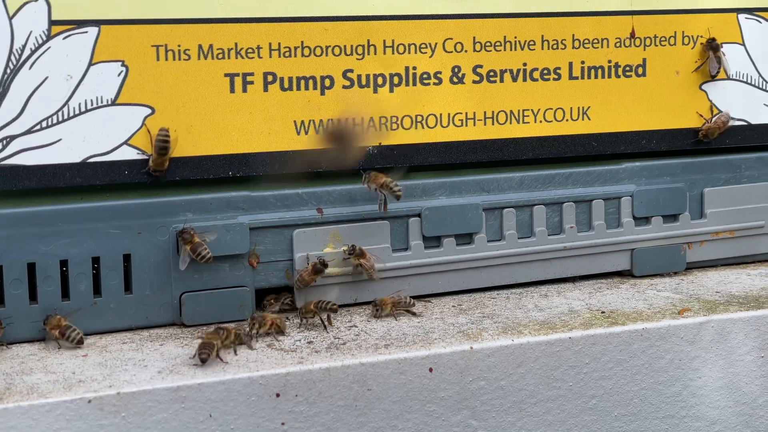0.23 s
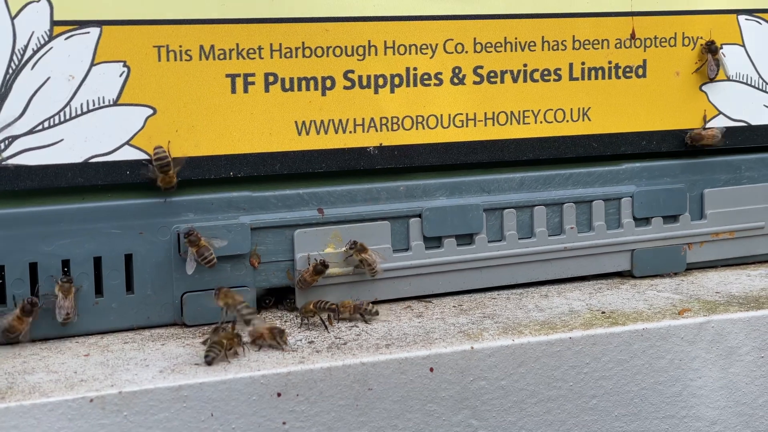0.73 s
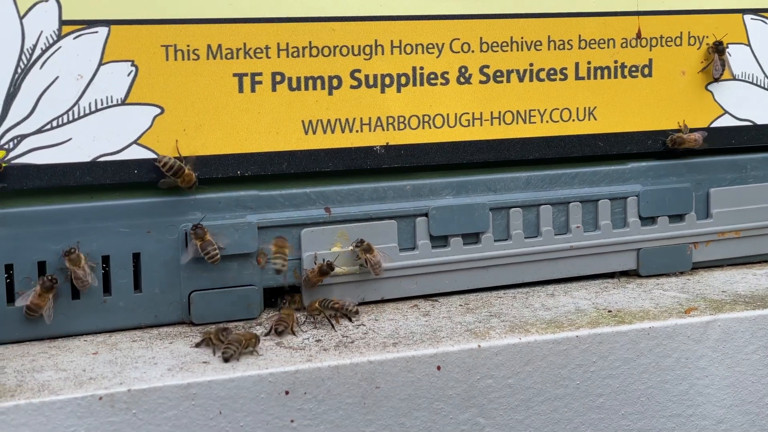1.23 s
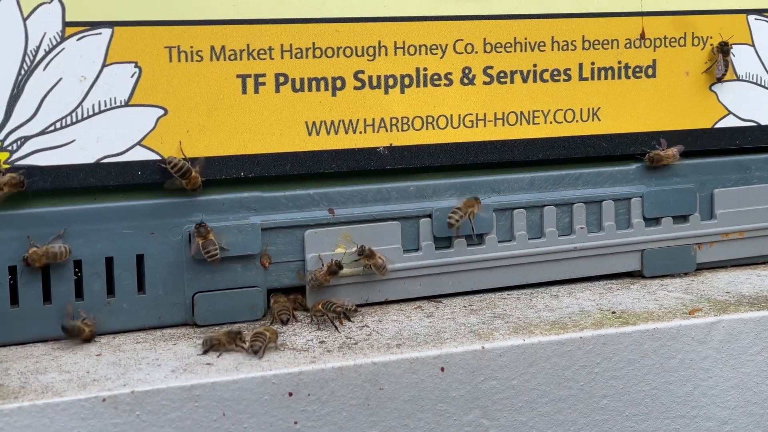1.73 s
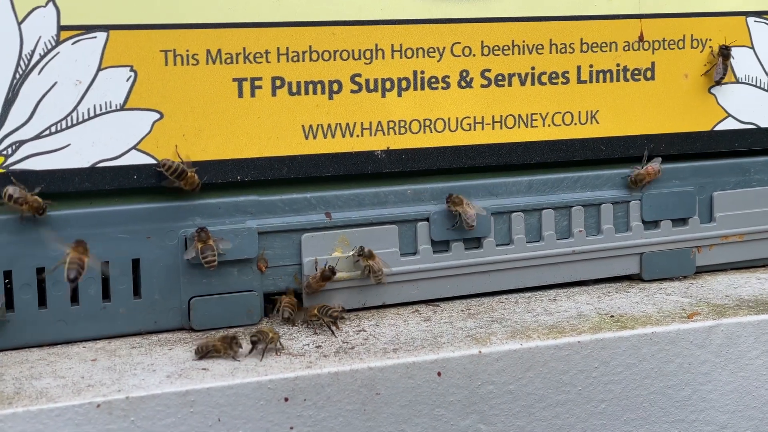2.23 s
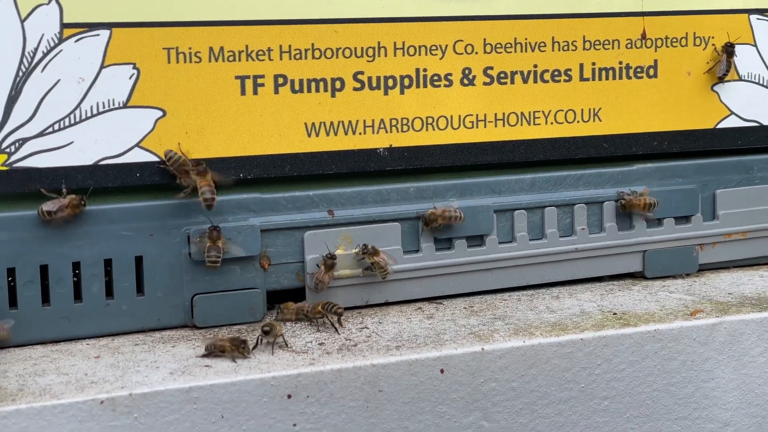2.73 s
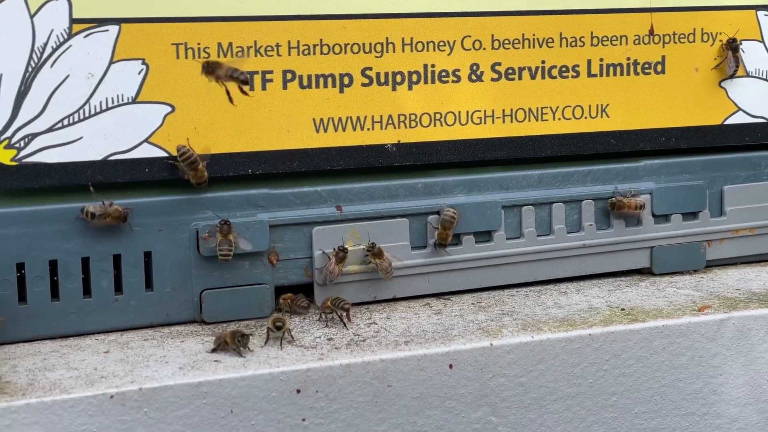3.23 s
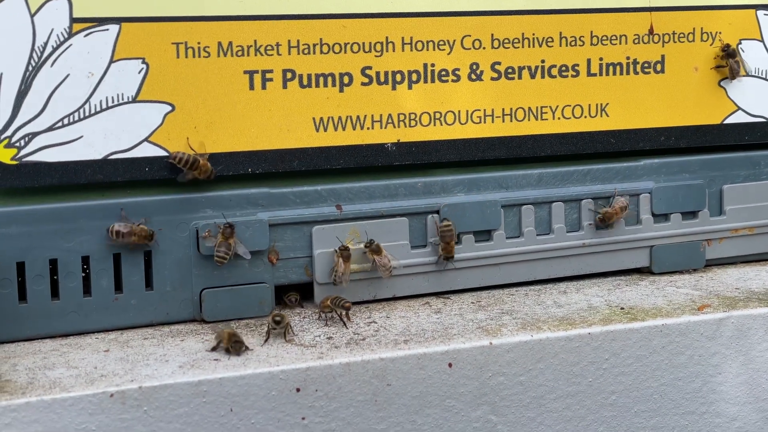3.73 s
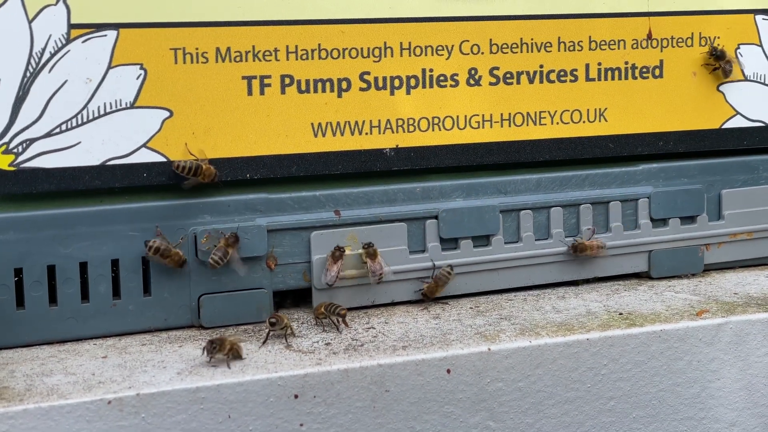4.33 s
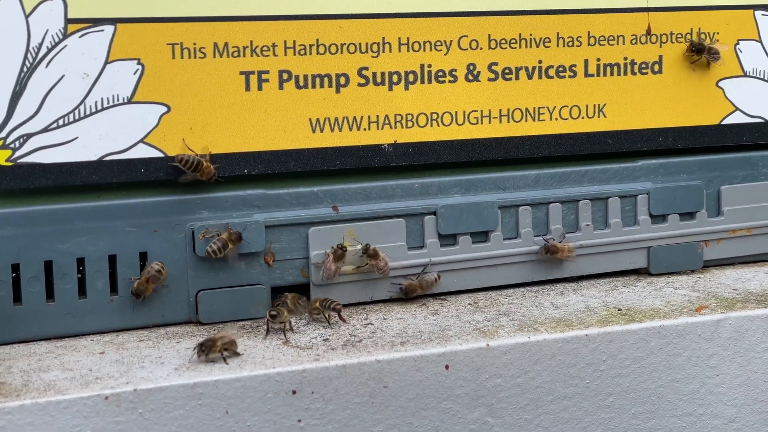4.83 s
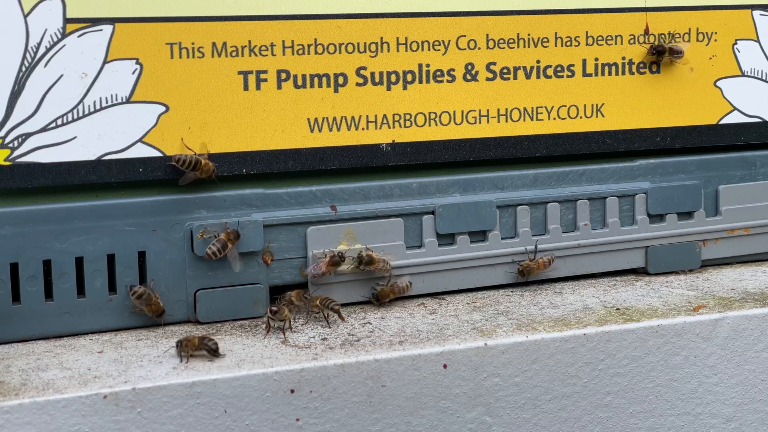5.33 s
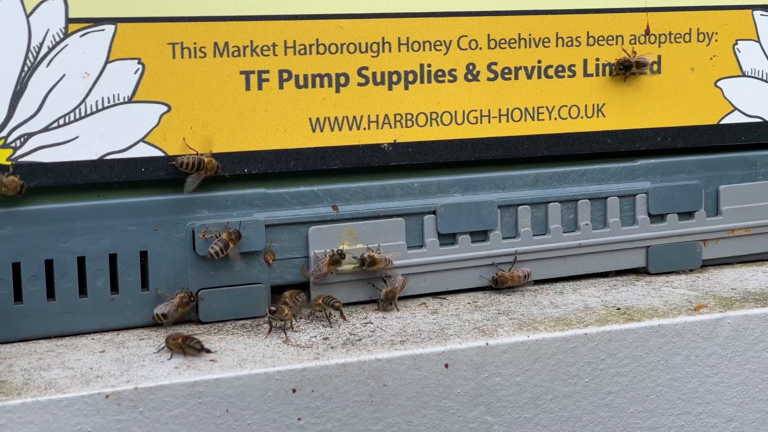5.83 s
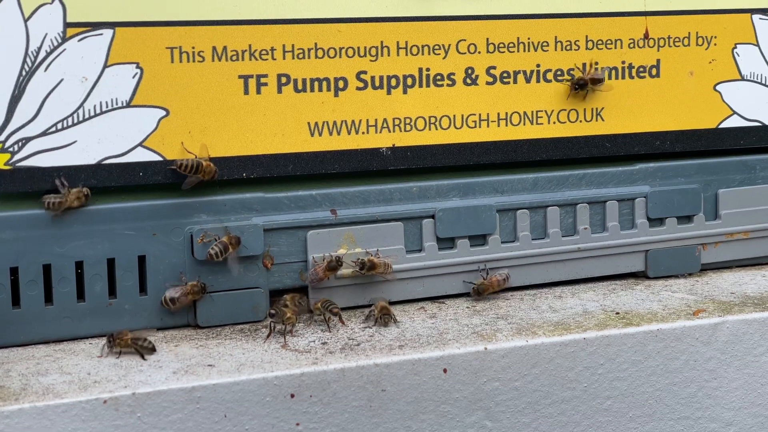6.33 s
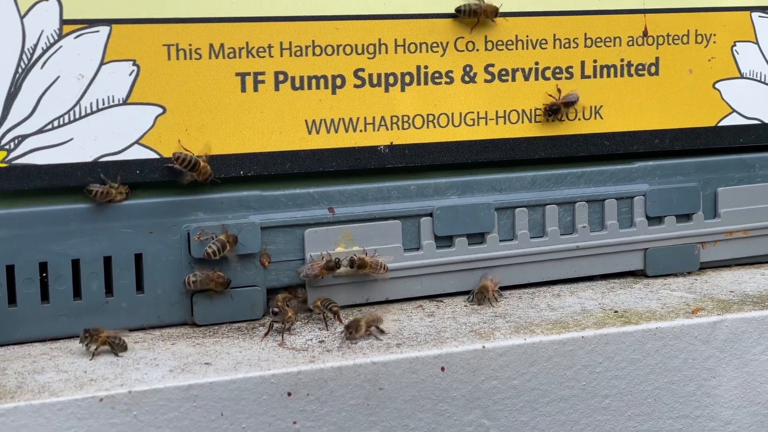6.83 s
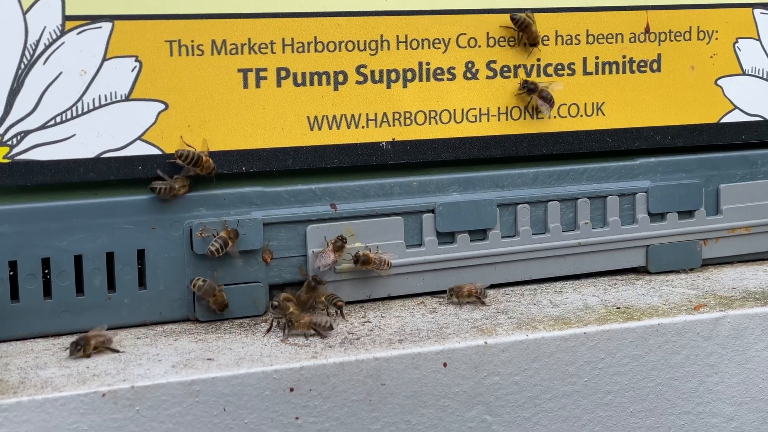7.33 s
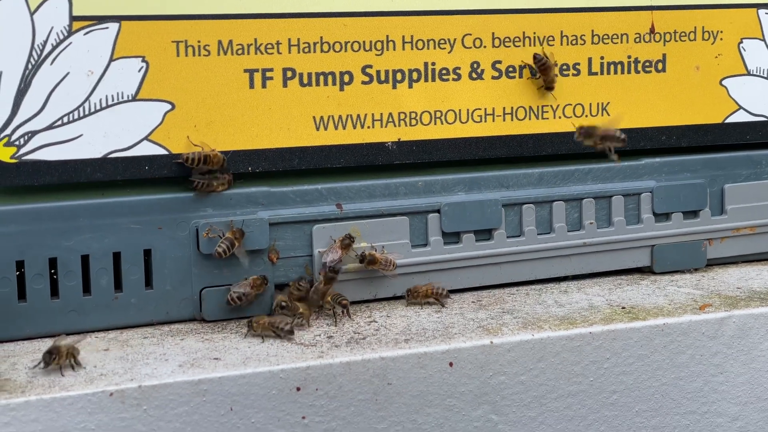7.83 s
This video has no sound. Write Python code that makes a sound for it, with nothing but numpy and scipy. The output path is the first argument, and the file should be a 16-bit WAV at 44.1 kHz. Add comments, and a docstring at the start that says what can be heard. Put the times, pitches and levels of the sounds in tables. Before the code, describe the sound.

A close, outdoor stereo pickup at a beehive. Throughout there is a quiet, wide wash of far traffic, leaves and air, with a faint wavering hum of many bees around 250 Hz. From 0 to 3 s light wind comes in uneven low gusts, with soft thumps near 1, 1.3, 1.8 and 2.6 to 3 s; bees pass gently, and short dry wing rattles tick at about 1.7 and 1.9 s. From 3 to 5.5 s it is calmer, mostly hum and wash. At 5.6 s a bee darts very close in a short, sharp buzz, then weaker passes follow until 6.9 s, with a papery rattle at 6.55 s. At about 7.5 s a bee suddenly hovers at the microphone: by far the loudest moment, a deep wobbling buzz with violent airy thuds until 7.9 s and fluttery ticks, fading unsteadily by 8.1 s.

```python
"""Honeybees at a hive entrance outdoors, heard close up through the two microphone ports of a phone.
Throughout lie a wide wash (shaped noise), a light wind (low noise) and far bees (wingbeat harmonics).
In the first three seconds bees pass near, wings brush the hive (noise ticks) and eddies thump on the ports.
From 5.6 s more bees pass close by, with short rattles; from 7.4 s the last one hovers so close that its
downwash (low noise and slowing pressure pulses) buffets the ports, while its wings rattle on the hive."""
import sys
import numpy as np
from scipy import signal
from scipy.fft import rfft, irfft, next_fast_len
from scipy.io import wavfile
from scipy.ndimage import uniform_filter1d

SR = 44100
rng = np.random.default_rng(int(sys.argv[2]) if len(sys.argv) > 2 else 0)


def digitize_waveform(pressure):
    """Quantize a signal to 16-bit integers and store it at the path in sys.argv[1].

    Rows of a 2-D input are taken as channels; values are limited to [-1, 1].
    """
    field = np.atleast_2d(pressure).T
    bounded = np.clip(field, -1, 1)
    quanta = np.round(bounded * 32767).astype(np.int16)
    wavfile.write(sys.argv[1], SR, quanta)


N = 356901  # length in samples


def gain_of(db):
    """Amplitude factor of a level in dB."""
    return 10 ** (np.asarray(db) / 20)


def evened(x):
    """Scale to an rms of 1."""
    return x / np.sqrt(np.mean(x ** 2) + 1e-20)


def read(points, hz):
    """Read a (frequency, dB) curve, straight between its points on a log frequency axis."""
    f, value = np.transpose(points)
    return np.interp(np.log(hz + 1), np.log(f + 1), value)


def columns(rows):
    """Start time and every column of a table, one value a sample."""
    s, *rest = np.transpose(rows)
    t = np.arange(s[0], s[-1], 1 / SR)
    return s[0], [np.interp(t, s, c) for c in rest]


def add(mix, s, sound):
    """Lay a sound into the mix from time s, cut off at the end."""
    part = mix[..., max(round(s * SR), 0):][..., :sound.shape[-1]]
    part += sound[..., :part.shape[-1]]


def drift(size, per_s):
    """Slow chance of rms 1 that changes about per_s times a second."""
    room = next_fast_len(size)
    hz = np.fft.rfftfreq(room, 1 / SR)
    slow = (hz > 0) / (1 + (hz / per_s) ** 4)
    return evened(irfft(rfft(rng.standard_normal(room)) * slow, room)[:size])


def band(x, lo_hz, hi_hz, order=2):
    """Keep the band between two frequencies."""
    return signal.sosfilt(signal.butter(order, [lo_hz, hi_hz], "band", fs=SR, output="sos"), x)


def ports(both, apart):
    """Left and right from what the ports share and what they differ by."""
    return np.array([both + apart, both - apart])


# a near sound reaches one port a little earlier: (frequency [Hz], difference over sum [dB])
PORT_LAG = [(50, -11), (250, -12), (500, -8), (900, -4), (1400, 5.5), (2000, -28)]


def lagged(x):
    """Left and right of a near source: the difference is the sum turned by a quarter cycle."""
    size = next_fast_len(len(x))
    turn = -1j * gain_of(read(PORT_LAG, np.fft.rfftfreq(size, 1 / SR)))
    return ports(x, irfft(rfft(x, size) * turn, size)[:len(x)])


# wash of far traffic, leaves and air, what the ports share: (frequency [Hz], relative density [dB])
WASH_SUM = [(35, -21), (60, -0.5), (150, -3), (300, -10), (520, -11), (620, -16.5), (1320, -21.5),
            (1920, -28), (7060, -38.5), (8120, -41.5), (8710, -73.5), (10000, -39), (12600, -34.5),
            (15600, -43)]
# the same wash, what the ports differ by, before a common trim: (frequency [Hz], relative density [dB])
WASH_DIFFERENCE = [(35, -45), (60, -2), (300, -5.5), (1120, -7.5), (1750, -25.5), (2100, -69),
                   (3000, -32.5), (5000, -45.5), (5700, -26), (6900, -27.5), (8910, -18), (12100, -27),
                   (13200, -42), (15600, -71)]
# its course; of the treble only the departure from its mean counts:
# (time [s], relative level [dB], relative treble [dB])
WASH_COURSE = [(0, -52, -8), (2.3, -52, -6), (4.1, -52, -9), (5.0, -53, -7), (6.2, -52, -8),
               (8.09, -53, -7.5)]


def wash():
    """Random short-time spectra with drifting patches; the port spacing moves some bands into the difference."""
    size, hop = 1024, 256
    frames, hz = N // hop + 5, np.fft.rfftfreq(size, 1 / SR)
    a, b, c, d, patches = rng.standard_normal((frames, len(hz), 5)).T
    patches = uniform_filter1d(patches, 14, 0)  # over frequency
    patches = evened(uniform_filter1d(patches, 16, 1))  # over time
    s, level_db, treble_db = np.transpose(WASH_COURSE)
    t = np.arange(frames) * hop / SR
    treble_share = np.clip((hz[:, None] - 5000) / 4000, 0, 1)
    treble = treble_share * np.interp(t, s, treble_db - treble_db.mean())
    field = gain_of(np.interp(t, s, level_db) + treble + 1.03 * patches)
    both = a + 1j * b
    # part of the difference is the same wave arriving later at one port; it turns over where the sum cancels
    linked = np.select([hz < 2000, hz < 8700], [.3, -.8], .8)[:, None]
    apart = 1j * linked * both + np.sqrt(1 - linked ** 2) * (c + 1j * d)
    z = np.array([both * gain_of(read(WASH_SUM, hz))[:, None],
                  apart * gain_of(read(WASH_DIFFERENCE, hz) - 13.5)[:, None]])

    def sound_of(spectra):
        return signal.istft(spectra, nperseg=size, noverlap=size - hop)[1]

    scale = np.sqrt(np.mean(sound_of(z[0]) ** 2))
    return gain_of(8.5) / scale * ports(*sound_of(z * field)[:, :N])


# wind on the ports, before its random lumps: (time [s], level [dB])
WIND = [(0.03, -36), (0.23, -45.5), (0.57, -37.5), (0.88, -50.5), (0.99, -27), (1.2, -49), (1.31, -30.5),
        (1.74, -36), (1.85, -30), (2.0, -43), (2.18, -37.5), (2.45, -41), (2.56, -33.5), (2.74, -34),
        (2.88, -44), (2.97, -38), (3.6, -54), (3.8, -40.5), (4.09, -54.5), (4.5, -44), (4.79, -41),
        (5.01, -46), (7.46, -45.5), (7.74, -26.5), (8.09, -44.5)]
# spectrum of the wind: (frequency [Hz], relative level [dB])
WIND_COLOUR = [(20, -13), (45, 8), (70, 9), (110, -1.5), (200, -25.5), (400, -36), (800, -79)]


def wind():
    """Lumpy low noise, nearly alike at both ports."""
    s, level_db = np.transpose(WIND)
    level_db = np.interp(np.arange(N) / SR, s, level_db) + 3.5 * drift(N, 6.8)
    colour = gain_of(read(WIND_COLOUR, np.fft.rfftfreq(N, 1 / SR)))
    noise = evened(irfft(rfft(rng.standard_normal((2, N))) * colour, N))
    both, apart = gain_of(level_db) * noise
    return ports(both, gain_of(-16.5) * apart)


SWARM_DB = -55  # rms level of the far bees together


def swarm(count=9):
    """Far bees, each with its own wandering wingbeat, coming and going."""
    harmonics_db = [0, 0, -10, -6, -4, -7, -10]
    out = np.zeros((2, N))
    for hz in np.linspace(228, 268, count):
        # slow drifts, drawn at every 50th sample
        wander, side, near = (np.repeat(drift(N // 50 + 1, 50 * per_s), 50)[:N] for per_s in (2.5, 1.2, 2.2))
        turns = np.cumsum(hz * (1 + .015 * wander)) / SR
        tone = sum(gain_of(db) * np.cos(2 * np.pi * k * turns) for k, db in enumerate(harmonics_db, 1))
        out += tone * gain_of(5 * near + 2 * np.array([side, -side]))
    return evened(out) * gain_of(SWARM_DB)


HIGH_LIFT_DB = 1  # added for each harmonic above the seventh, against the steady fall


def flight(hz, level_db, low_db, third_db, fall_db, pan_db):
    """Clean wingbeat harmonics, those above the third changing step by step, and a puff of air each beat."""
    puffs = (.4 + np.cos(np.pi * np.cumsum(hz) / SR) ** 2) * rng.standard_normal((2, len(hz)))
    air_db = level_db + np.maximum(low_db, 0) - 27.5
    air = gain_of(air_db) * evened(band(puffs, 600, 1450, order=3))
    levels_db = [level_db + low_db, level_db]
    for k in range(10):  # third to twelfth harmonic
        levels_db.append(level_db + third_db - abs(fall_db) * k + HIGH_LIFT_DB * max(k - 4, 0))
    turns = np.cumsum(hz * (1 + .008 * drift(len(hz), 50))) / SR
    tone = 0
    for k, db in enumerate(levels_db, 1):
        flicker_db = .2 * min(k, 4) ** 2 * drift(len(hz), 55)  # stronger up to the fourth harmonic
        wave = np.sqrt(2) * np.cos(2 * np.pi * k * turns + 1.3 * k ** 2)
        tone = tone + gain_of(db + flicker_db) * wave
    fade = signal.windows.tukey(len(hz), .08)
    return (lagged(tone * fade) + air * fade) * gain_of([[pan_db / 2], [-pan_db / 2]])


# bees passing the phone: (closest [s], time near [s], level of the second harmonic when closest [dB],
# wingbeat when closest [Hz], glide there [Hz per s], fundamental over the second harmonic [dB],
# third harmonic over the second [dB], fall for each higher harmonic, sign ignored [dB],
# left over right [dB])
PASSES = [(0.12, 0.12, -55.5, 239, -1, -0.5, -10, 3, 5), (0.42, 0.094, -53, 240, 40.5, 1.5, -8, 2, -1),
          (0.87, 0.052, -50.5, 266, -42.5, 1.5, -9.5, 3.5, 3),
          (2.38, 0.11, -53.5, 248.7, -19.5, 1.8, -8, 2.5, .5),
          (2.96, 0.026, -53.5, 247, -37.5, -11, -16, -0.3, 0),
          (5.612, 0.011, -39.5, 240, -54, 7, -9.5, 5, 0), (5.644, 0.0106, -30.5, 247.9, 500, 8, -15, 3, 1),
          (5.711, 0.0308, -44, 240, -100, -3.5, -11.5, 4, 2), (5.8, 0.054, -53.5, 265, 146, -9, -19, 5, 10),
          (6.04, 0.025, -54.5, 250, 7, 10, -17, 1, 2), (6.13, 0.021, -43, 242, -36, -26, -18, 2.5, -2),
          (6.24, 0.0694, -49.5, 250, 151, 7.5, -10, 3, 4),
          (6.57, 0.059, -50.5, 244, 20, 5.5, -13.5, 1.5, -7), (6.69, 0.052, -56, 229, -64, 6, -3, 9, -9),
          (6.931, 0.041, -60.5, 250, -60, 10, -4, 4, -5)]
RECEDE_DB = 9.5  # loss for each doubling of distance


def passing(closest_s, near_s, level_db, hz, glide, *colour):
    """A bee on a straight line: loudest at its closest point, the wingbeat gliding while it is near."""
    start = max(closest_s - .25, 0)
    t = np.arange(start - closest_s, .25, 1 / SR)
    away = np.sqrt(1 + (t / near_s) ** 2)  # distance over the closest distance
    return start, flight(hz + glide * t / away, level_db - RECEDE_DB * np.log2(away), *colour)


# wings brushing the hive: (loudest from [s], level of the bright ticks [dB], hold [s], fall time [s],
# low knock over the bright ticks [dB])
RATTLES = [(1.735, -50.5, .004, 0.031, -7), (1.946, -56.5, .004, .02, -14), (5.63, -65, 0.058, 0.039, 5),
           (6.535, -55.5, .004, .012, -6), (6.556, -56, 0.073, 0.028, 4.5), (6.588, -54, .006, .012, -24),
           (7.551, -51, .006, 0.018, -4), (7.588, -52, .012, 0.017, -8), (7.629, -56.5, .01, 0.024, -6),
           (7.717, -58, 0.0102, .02, -3), (7.76, -62, .09, .025, -2.5)]
RATTLE_HZ = 239.4  # mean ticks a second
RATTLE_RISE = 0.39  # rise time over fall time


def rattles():
    """One short noisy tick a wingbeat, uneven in strength, bright with a duller knock."""
    t, touch, low = np.arange(N) / SR, np.zeros(N), np.zeros(N)
    for s, level_db, hold, fall, knock_db in RATTLES:
        rise = (np.maximum(s - t, 0) / (RATTLE_RISE * fall)) ** 2
        decay = np.maximum(t - s - hold, 0) / fall
        swell = gain_of(level_db) * np.exp(-rise - decay)
        touch += swell
        low += gain_of(knock_db) * swell
    turns = np.cumsum(RATTLE_HZ * (1 + 0.019 * drift(N, 44))) / SR
    strength_db = rng.standard_normal((3, int(turns[-1]) + 1))  # one draw a beat
    strength = gain_of(strength_db)[:, turns.astype(int)]
    ticks = strength * (.12 + np.exp(-(turns % 1) / .16)) * rng.standard_normal((3, N))
    bright = evened(band(ticks[0], 10360, 13900, order=3))
    dull = band(ticks[1], 2200, 5200)
    knock = evened(dull + .65 * band(ticks[1], 5900, 8100) + .5 * band(ticks[1], 13500, 15600))
    apart = gain_of(0.5) * evened(band(ticks[2], 7500, 11800, order=3))
    return ports(touch * bright + low * knock, touch * apart)


# single eddies that thump on the ports, level as shared by both:
# (time [s], peak level [dB], first pitch [Hz], last pitch [Hz])
THUMPS = [(0.977, -25, 320, 75), (1.291, -24, 130, 88.4), (1.333, -26.5, 225, 75), (1.83, -28, 300, 62),
          (2.553, -25, 199, 77), (2.652, -20.5, 395, 85), (2.707, -21, 110, 74), (2.751, -25.5, 396, 84),
          (2.944, -26, 161, 95), (7.577, -23, 250, 146), (7.599, -20, 252, 127), (7.624, -9, 327, 180),
          (7.638, -6, 383, 224), (7.648, -22, 305, 252), (7.659, -4, 610, 400), (7.681, -8.5, 476, 302),
          (7.695, -7, 388, 208), (7.71, -13.5, 580, 405), (7.736, -5.5, 570, 310), (7.742, -11, 305, 180),
          (7.75, -19, 144, 64.4), (7.866, -9, 470, 161.3), (8.027, -36, 463, 149.8)]


def thump(peak_db, start_hz, end_hz):
    """One eddy: about two cycles of pressure that slow down as it passes."""
    u = np.arange(0, 4, end_hz / SR)  # time in cycles of the final pitch
    turns = np.cumsum(end_hz + (start_hz - end_hz) * np.exp(-u / .5)) / SR
    swell = (1 - np.exp(-(u / 0.35) ** 2)) * np.exp(-u ** 1.56)
    shape = -np.sin(2 * np.pi * turns) * swell
    return gain_of(peak_db) * shape / abs(shape).max()


# air blown down on the ports by the hovering bee, before its random lumps:
# (time [s], level shared by both ports [dB], upper edge [Hz])
DOWNWASH = [(7.52, -43, 300), (7.55, -26.5, 380), (7.62, -18, 400), (7.72, -24, 450), (7.76, -19.5, 253),
            (7.81, -38, 200), (7.885, -22.5, 200), (7.92, -36, 220), (8.0, -45, 170), (8.035, -30.5, 423),
            (8.09, -49, 250)]


def downwash():
    """Turbulence under the wings: low lumpy noise whose upper edge moves."""
    s, (level_db, edge_hz) = columns(DOWNWASH)
    size = len(level_db)
    hz, t, z = signal.stft(rng.standard_normal(size), SR, nperseg=512, noverlap=384)
    above = hz[:, None] / np.interp(t, np.arange(size) / SR, edge_hz)
    z = z * (gain_of(-7 * above ** 2) + .06 / (1 + (above / 2) ** 4))  # steep edge and a weak tail above
    z = z / (1 + (45 / (hz[:, None] + 1)) ** 3)  # less of the deepest bass
    roar = evened(signal.istft(z, SR, nperseg=512, noverlap=384)[1][:size])
    return s, gain_of(level_db + 1.7 * drift(size, 37)) * signal.windows.tukey(size, .04) * roar


# the bee that hovers at the phone: (time [s], wingbeat [Hz], level of the second harmonic [dB],
# fundamental over the second harmonic [dB], fall for each higher harmonic [dB])
HOVER = [(7.42, 260.4, -58.5, 0, 8), (7.49, 243.4, -42.5, 11, 7), (7.54, 227.4, -16, 0.5, 10),
         (7.56, 234.5, -27.5, -11, 7.5), (7.61, 240.5, -23, -16, 18), (7.7, 232.8, -22, -8, 15),
         (7.785, 221.3, -23, -5.5, 8), (7.838, 245.2, -24, 0, 8.5), (7.888, 226.5, -25.5, -16, 13),
         (7.922, 242.7, -27.5, -20, 19), (7.995, 212.6, -30.5, -16, 9.5), (8.03, 239.8, -41, -6, 2.5),
         (8.09, 239, -33, -16, 16)]
HOVER_THIRD_DB = -10.5  # third harmonic over the second
HOVER_LEAN_DB = 0.3  # left over right


def hovering():
    """The last bee wobbles in front of the ports, in pitch, level and colour."""
    s, (hz, level_db, low_db, fall_db) = columns(HOVER)
    return s, flight(hz, level_db, low_db, HOVER_THIRD_DB, fall_db, HOVER_LEAN_DB)


def scene():
    """Wash, wind and far bees, then the near bees, their rattles and the buffeting of the ports."""
    mix = wash() + wind() + swarm() + rattles()
    for row in PASSES:
        add(mix, *passing(*row))
    add(mix, *hovering())
    buffeting = np.zeros(N)
    for s, *row in THUMPS:
        add(buffeting, s, thump(*row))
    add(buffeting, *downwash())
    return mix + lagged(buffeting)


EDGE_HZ = 15700  # upper band limit


def record(dry):
    """The microphones drop the deepest bass; then the band limit."""
    cut = signal.sosfiltfilt(signal.butter(3, 36, "high", fs=SR, output="sos"), dry)
    limit = signal.firwin(1023, EDGE_HZ, window=("kaiser", 9), fs=SR)
    return signal.oaconvolve(cut, limit[None], "same")


dry = scene()
out = record(dry)
digitize_waveform(out)
```